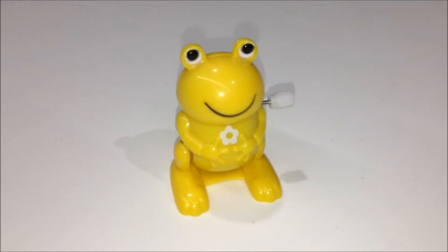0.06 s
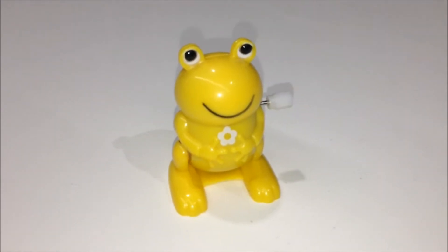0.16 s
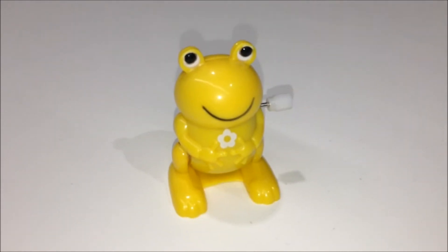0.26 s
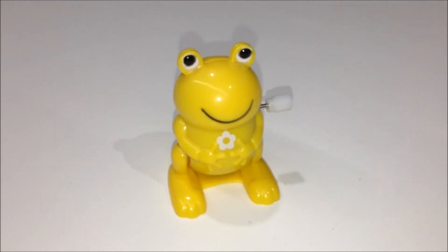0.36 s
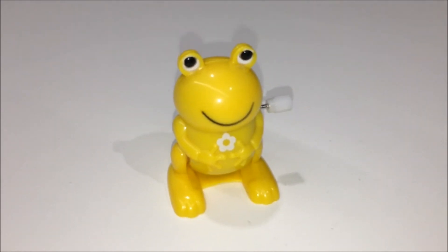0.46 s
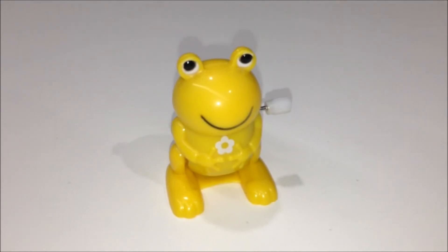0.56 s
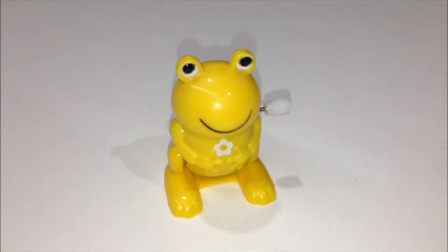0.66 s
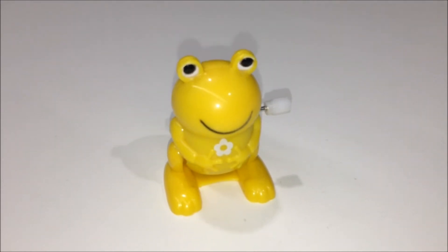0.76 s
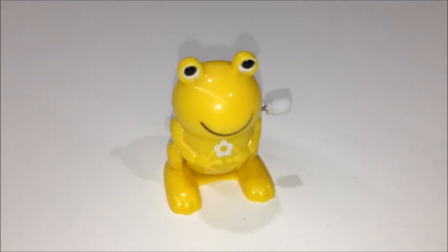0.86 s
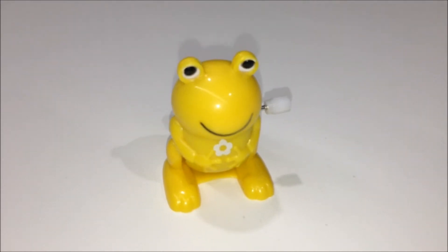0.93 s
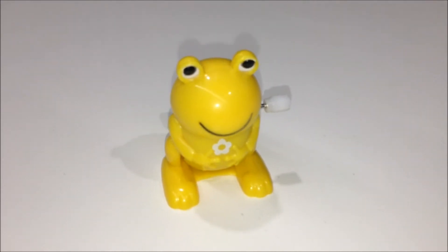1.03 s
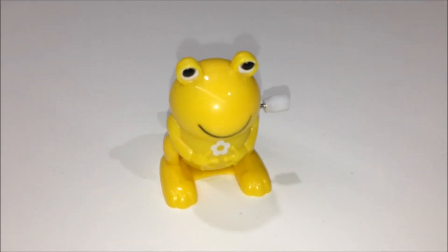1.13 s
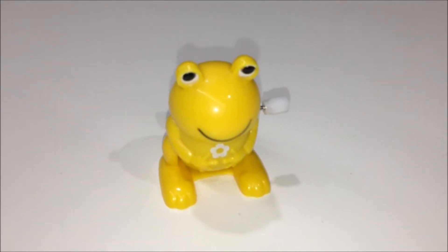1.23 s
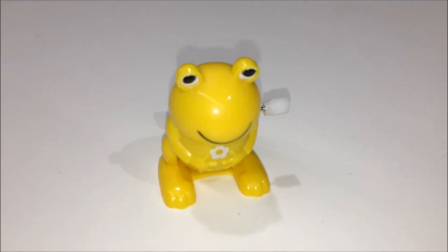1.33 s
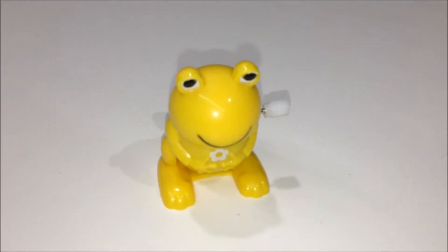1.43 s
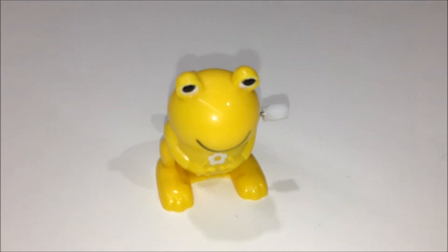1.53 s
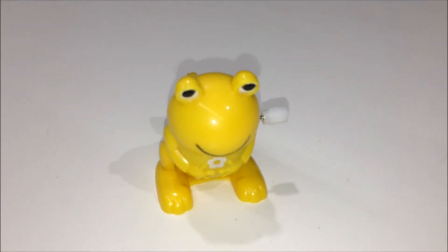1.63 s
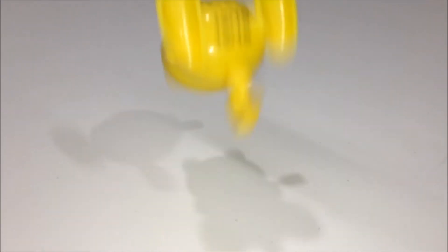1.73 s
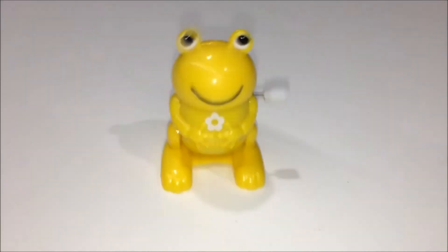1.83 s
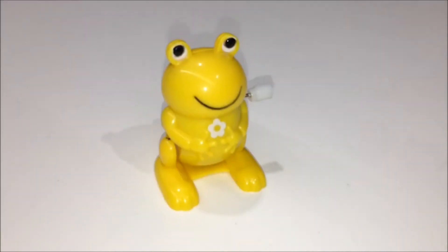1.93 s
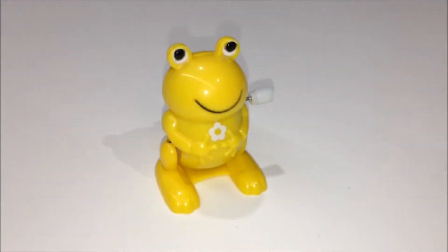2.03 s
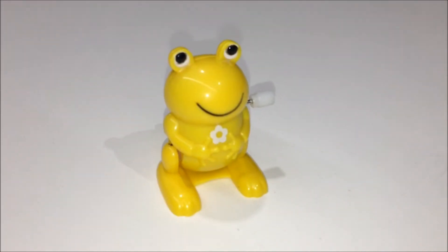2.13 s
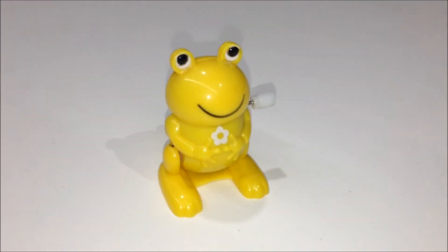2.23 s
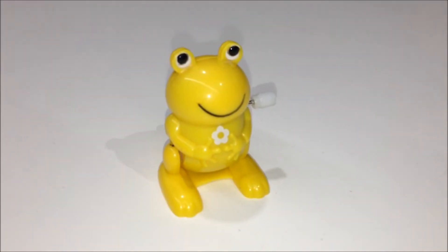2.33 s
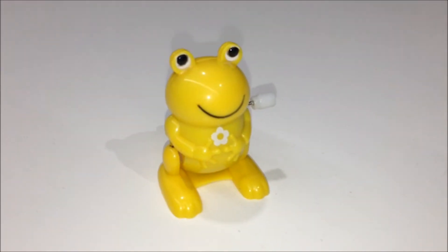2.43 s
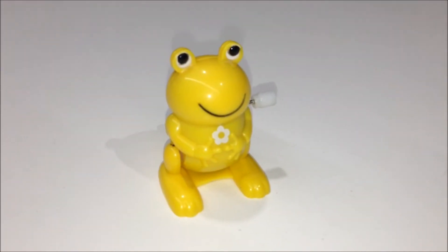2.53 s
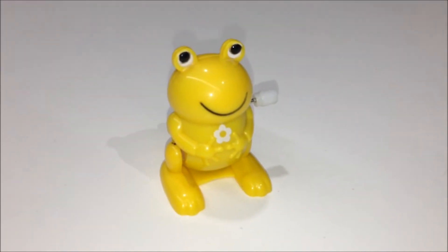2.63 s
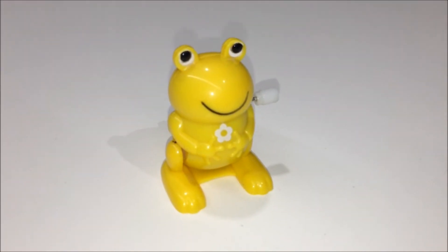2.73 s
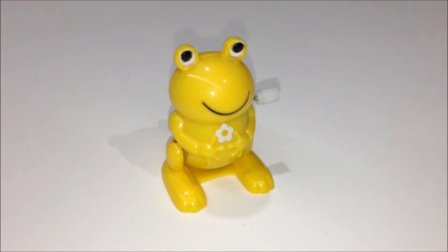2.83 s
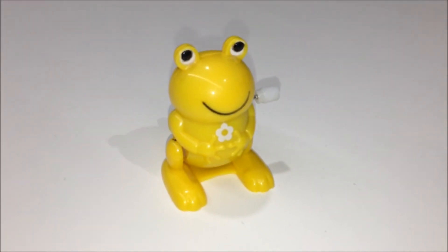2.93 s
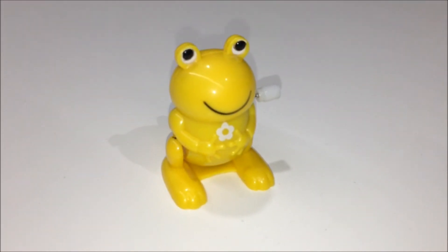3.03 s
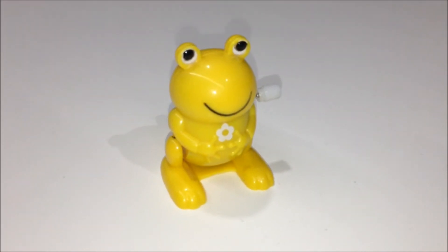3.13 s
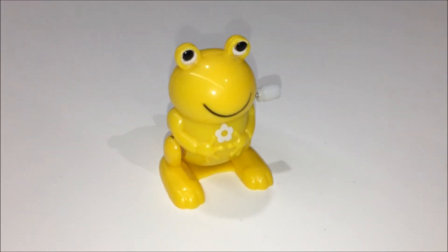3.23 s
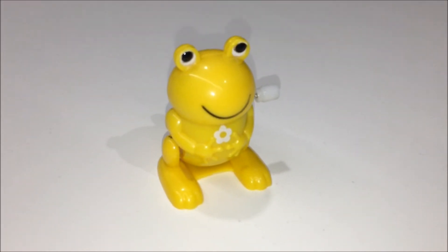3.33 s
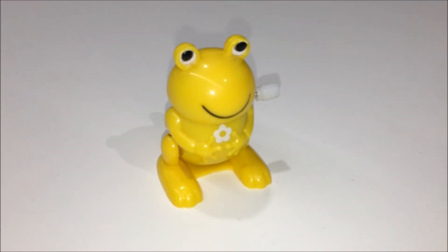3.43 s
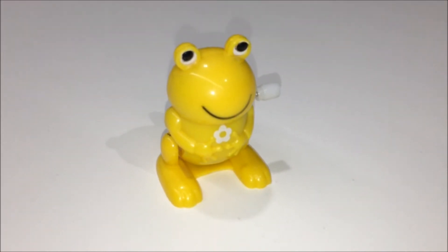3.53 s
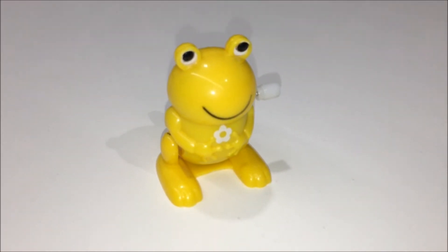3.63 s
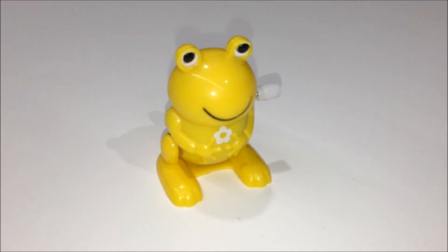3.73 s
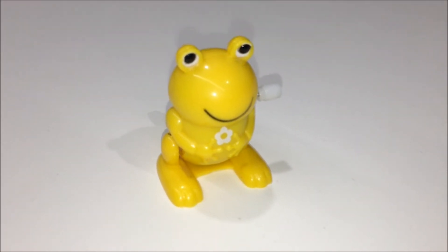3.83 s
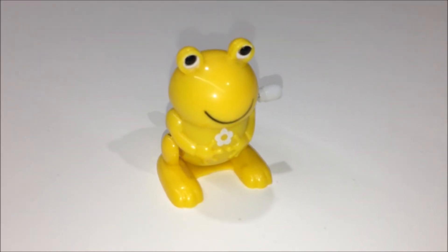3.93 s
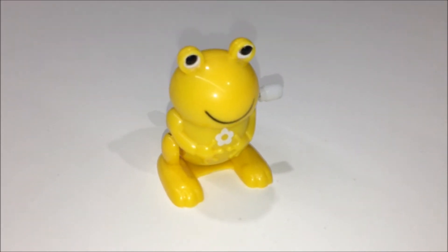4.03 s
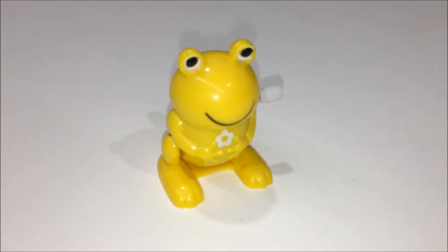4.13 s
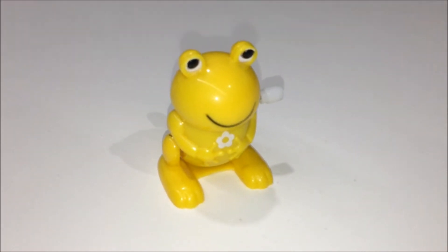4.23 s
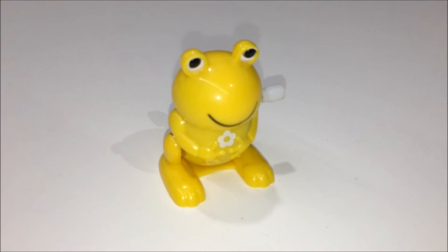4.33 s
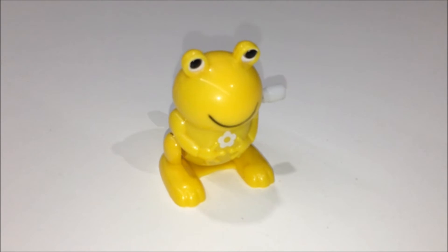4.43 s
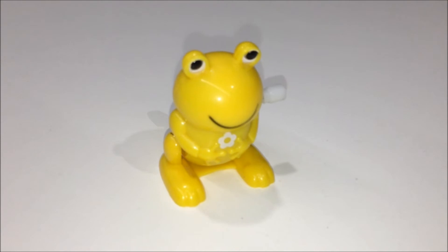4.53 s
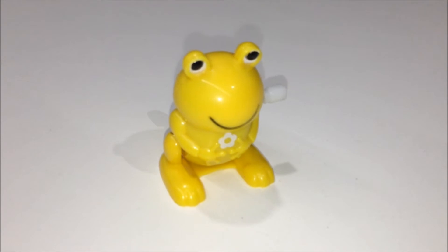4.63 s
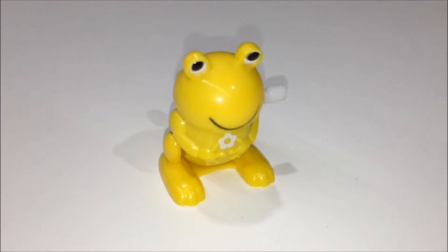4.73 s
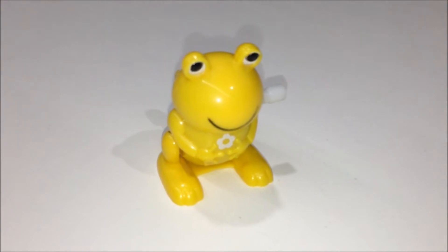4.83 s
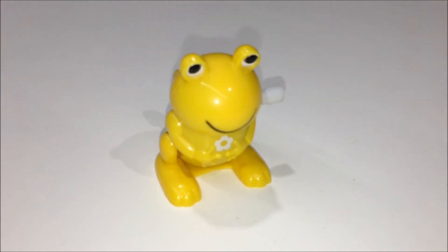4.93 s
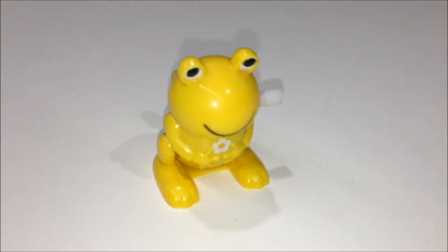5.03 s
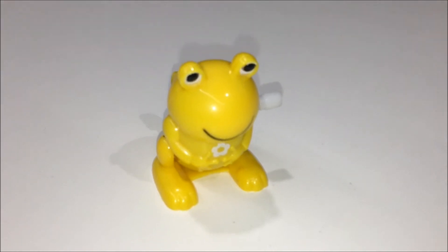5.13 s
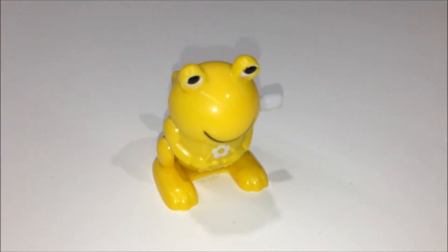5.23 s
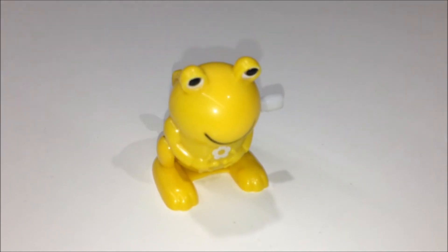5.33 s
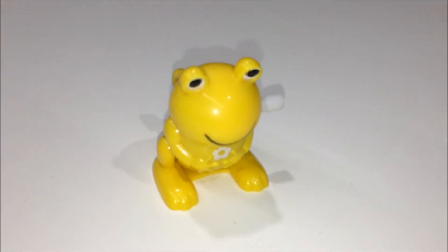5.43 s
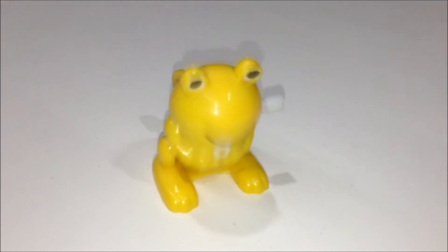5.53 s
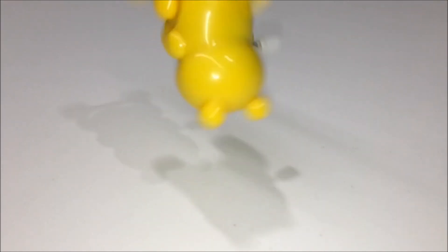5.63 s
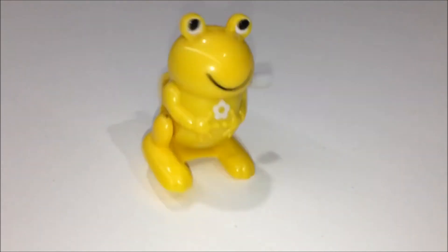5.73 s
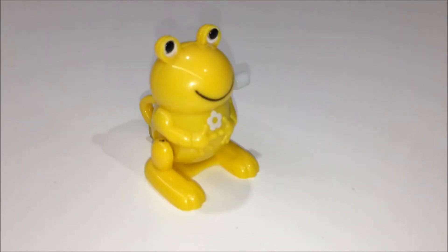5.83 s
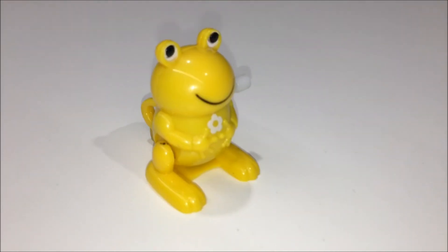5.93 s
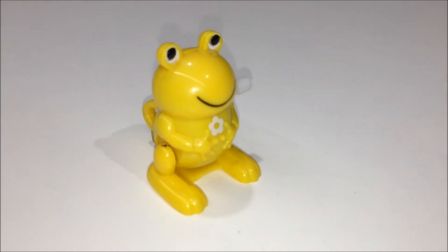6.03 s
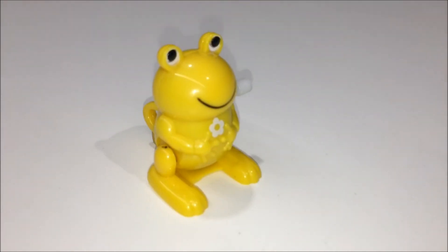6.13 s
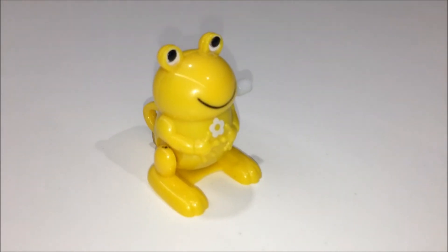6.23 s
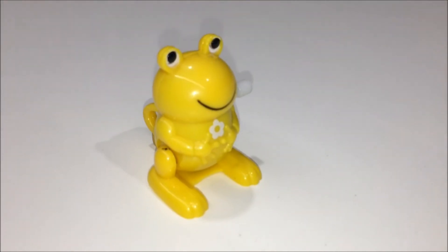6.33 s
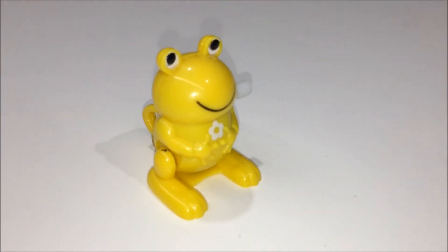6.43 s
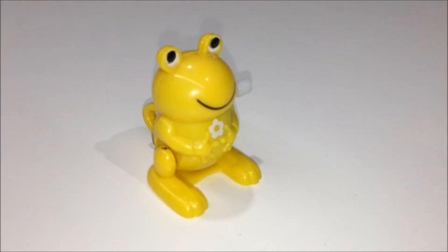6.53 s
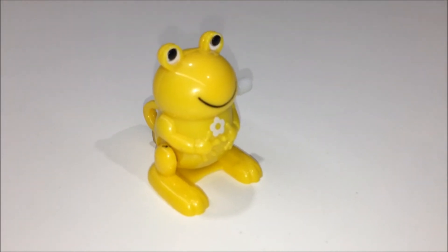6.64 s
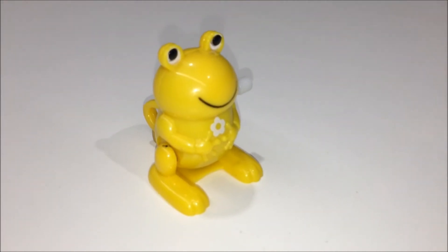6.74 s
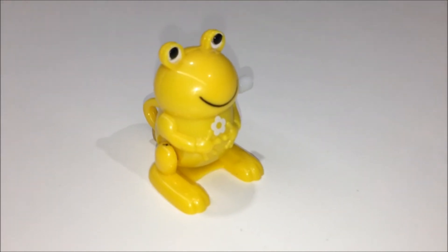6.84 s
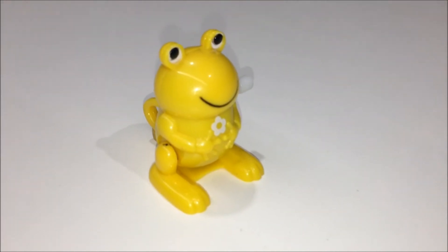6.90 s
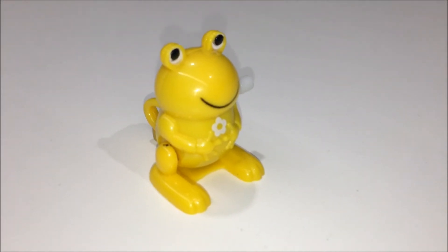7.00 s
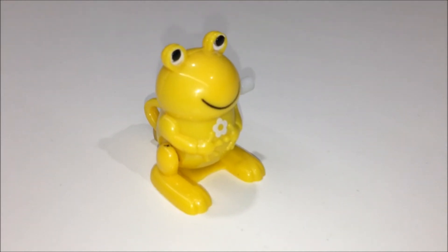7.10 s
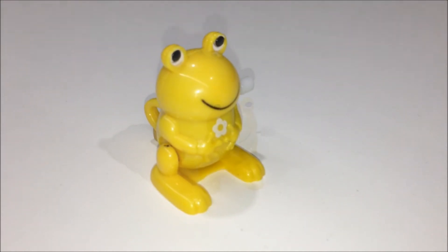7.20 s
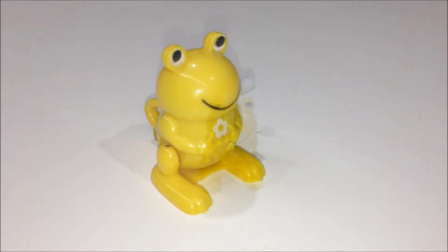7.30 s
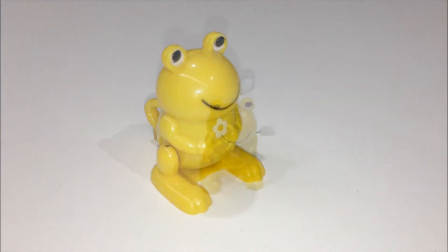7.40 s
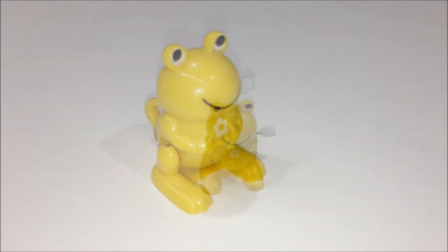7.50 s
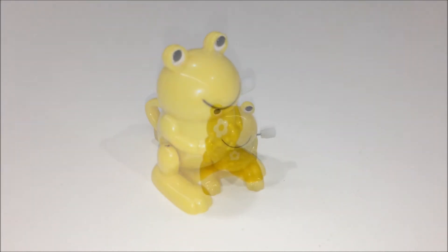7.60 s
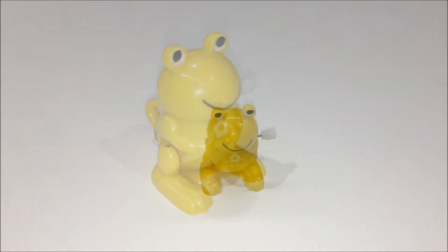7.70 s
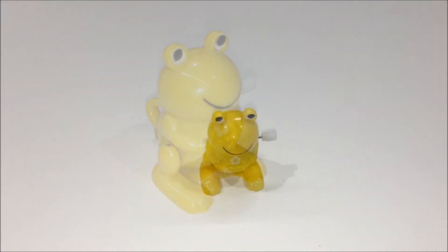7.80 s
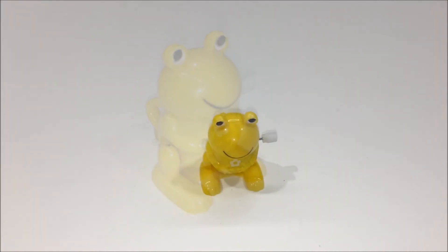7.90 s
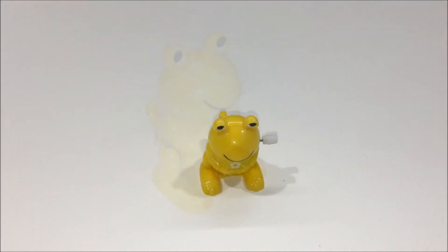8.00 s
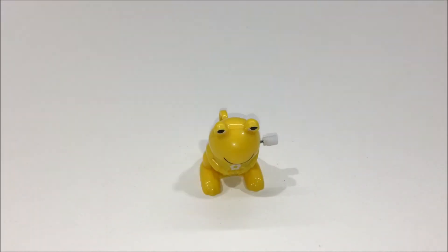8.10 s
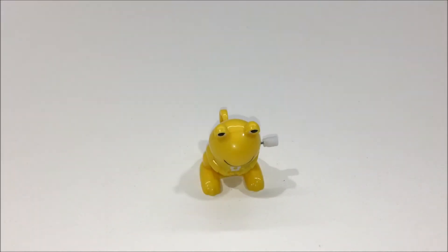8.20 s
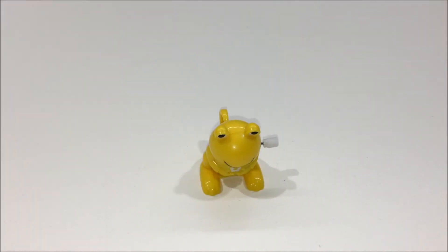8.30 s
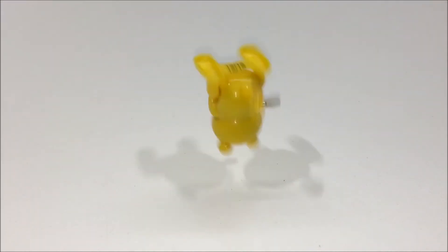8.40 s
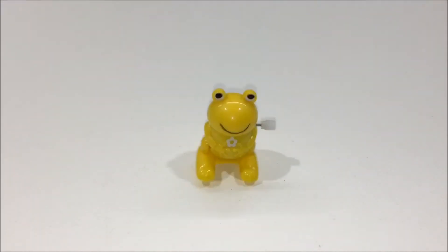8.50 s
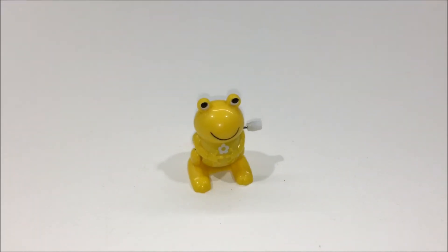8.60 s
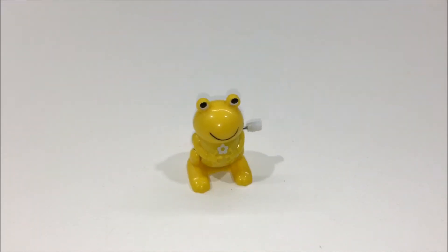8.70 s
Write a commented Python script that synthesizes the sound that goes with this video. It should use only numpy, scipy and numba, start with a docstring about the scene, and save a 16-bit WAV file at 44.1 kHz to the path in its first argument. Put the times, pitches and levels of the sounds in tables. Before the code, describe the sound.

Close microphone, dry quiet room with a soft low murmur. A hollow plastic clockwork motor hisses, strains into a buzzing chatter, then springs free: crisp snap, brief airborne whirr, hard landing and tabletop boom. A longer strain grinds down to distinct rapid ticks before a second jump. The motor abruptly loses speed near the end, then a smaller, higher, steadier whirr takes over, with one sharp light landing.

```python
"""Two jumping clockwork frogs

Two plastic frogs crouch and jump on a tabletop, close by: a big one twice, then a small one once.
A pallet chatters against the escape wheel and rings the hollow shell: a hiss when it runs free, a slow
rattle while a cam tensions the leg spring. Legs snap and landings clatter as bursts of filtered noise.
The table booms in its own modes, over faint echoes and the soft noise of a quiet room."""
import sys
import numpy as np
from scipy import signal
from scipy.fft import rfft, irfft
from scipy.io import wavfile
from numba import njit

SR = 44100
rng = np.random.default_rng(int(sys.argv[2]) if len(sys.argv) > 2 else 0)


def wrap_up_sound(samples):
    """Save the sound to the file named by the first command line argument, as 16-bit audio."""
    columns = np.atleast_2d(samples).T
    # keep every value between -1 and 1, then stretch to whole-number steps
    tamed = np.clip(columns, -1, 1)
    steps = np.round(tamed * 32767).astype(np.int16)
    wavfile.write(sys.argv[1], SR, steps)


N = 386316  # length in samples
TIME = np.arange(N) / SR

# Ways the big frog's hollow shell rings. Each row: pitch in Hz, filter width in Hz, then relative level
# in dB running free, at half load and at full load.
BIG_SHELL = [(1480, 1400, -20, -20, -24), (1870, 450, -16.5, -16.5, -16.5), (3243, 870, -17.5, -6.5, -11.5),
             (3360, 260, -37.5, -15, -1), (4050, 370, -24, -5.5, -14), (4250, 290, -14, -10, -4),
             (5300, 790, -19.5, -13, -15.5), (5700, 3000, -10, -13, -17), (6580, 460, -15, -13, -14.5),
             (7060, 350, -14.5, -9.5, -13), (7560, 570, -12.5, -11.5, -10), (8280, 790, -6.5, -11, -15.5),
             (9030, 340, -8.5, -10, -11), (9400, 240, -22, -14.5, -20), (9930, 560, -14, -12, -28),
             (11140, 1100, -10, -11.5, -11.5), (12000, 400, -17.5, -13.5, -21), (12600, 430, -16, -21, -10),
             (13200, 650, -7, -8.5, -19), (14200, 1500, -23, -27, -12), (15100, 1400, -8, -16.5, -23)]
# The small frog's shell. Each row: pitch in Hz, filter width in Hz, then relative level in dB
# running free and at full load.
SMALL_SHELL = [(1230, 750, -22.5, -23), (1830, 510, -20, -28.5), (2270, 740, -19, -23),
               (3180, 1400, -26, -13), (3670, 1200, -17.5, -11.5), (4220, 710, -11, -10.5),
               (5260, 400, -22, -16.5), (5920, 1300, -12, -14), (7200, 1130, -5.5, -6.5),
               (8470, 1000, -8, -16.5), (8960, 480, -11, -6.5), (9350, 670, -16, -10),
               (9850, 1400, -11, -12.5), (10700, 860, -10, -13), (11400, 1190, -18, -11.5),
               (13100, 2200, -5, -7.5), (15200, 2500, -16, -12.5)]
# Speed the big frog's mainspring can keep up; it runs down at the end.
# Each row: time in seconds, pallet strikes per second before the cam slows them.
BIG_PACE = [(0, 850), (2.68, 800), (5.7, 730.2), (6.05, 690), (6.68, 699), (6.78, 385), (7, 282),
            (7.204, 159.6)]
# The same for the small frog. Each row: time in seconds, pallet strikes per second.
SMALL_PACE = [(7.205, 1226), (8.76, 1169)]
# Each crouch and jump. Each row: the times in seconds when the cam meets the leg lever, grips it, pushes
# hardest, the frog takes off and lands, then the slowest strike rate in Hz (before small stumbles)
# and how far the gearbox pressing on the shell lifts its body modes, in dB.
JUMPS = [(.2, .51, 1.01, 1.856, 2.002, 405, 2.2), (2.68, 3.03, 4.35, 5.722, 5.868, 131, 3.8),
         (7.5, 7.72, 8.03, 8.497, 8.641, 840, 0)]
# The cam meets the leg lever, whose buzz sinks as it is pressed. Each row: start in seconds,
# length in seconds, first pitch in Hz, last pitch in Hz, level in dB relative to the motor.
LEVER_BUZZES = [(0.26, 0.18, 6800, 6660, -7), (0.344, 0.18, 5300, 5100, -5.5), (2.808, 0.2, 5270, 5150, -7),
                (6.711, 0.54, 5650, 5240, -7.5), (7.54, 0.2, 5500, 5160, -10.5)]
# Legs snapping, landings and rocking feet. Each row: start in seconds, rattle length in seconds before
# it fades, level in dB, pitch of the bright crack in Hz, level of the dull clack in dB against the crack.
KNOCKS = [(1.8416, 0.0038, -29.5, 5000, -2), (1.8527, 0.0066, -18, 10000, -8.5),
          (1.991, 0.0043, -30, 8460, -5), (2.001, 0.0017, -18.5, 9000, -3),
          (2.0034, 0.0056, -13, 9150, -11.5), (2.073, 0.0011, -22.5, 6500, -9),
          (2.094, 0.0019, -36, 5500, 3), (5.71, 0.0019, -26, 4530, -6),
          (5.7187, 0.0075, -19.5, 10000, -9.5), (5.858, 0.0016, -22, 7500, -6),
          (5.8675, 0.0025, -16.5, 8000, -4.5), (5.869, 0.007, -13, 8900, -10),
          (5.938, 0.0013, -25, 3740, -5), (5.9627, 0.00061, -15, 8200, -11.5),
          (5.99, .0015, -28, 5300, -12), (8.492, 0.0076, -21, 10000, -13.5), (8.639, 0.0066, -19, 9900, -7),
          (8.646, 0.0022, -8, 8550, -21), (8.7232, .0008, -24.5, 9050, -8)]
# Dull clack of feet and legs. Each row: pitch in Hz, filter width in Hz, relative level in dB.
CLACK_MODES = [(644, 850, -3.5), (1360, 730, 4.5), (1820, 400, 6), (3280, 3800, 4.5)]
# Weight on the tabletop. Each row: start in seconds, push in dB, contact time in seconds,
# low sway in dB relative to the push.
THUMPS = [(1.853, -17, 0.00089, -16), (2.0023, 0.5, 0.00085, -20.5), (2.069, -8.5, 0.0021, -45),
          (5.721, -16, 0.0015, -23), (5.869, 1, 0.00092, -34), (5.94, -13, 0.0027, -40),
          (8.641, -9.5, 0.00013, -44)]
# Ways the tabletop rings. Each row: pitch in Hz, level in dB, time to fade by 60 dB in seconds.
TABLE_MODES = [(126, -49, 0.73), (170.5, -35, 0.46), (194.4, -35, 0.32), (282, -30, 0.29),
               (336, -33.5, 0.26), (351.2, -33, 0.34), (414.6, -37, 0.33), (432, -46, 0.15),
               (569.5, -33, 0.25), (647.4, -33, 0.12), (830, -41, 0.12)]
# Low drone of the small frog's run. Each row: pitch in Hz, filter width in Hz, level in dB.
DRONE = [(105.5, 35, -58), (208, 200, -58)]
# Colour of the room noise. Each row: pitch in Hz, relative level in dB per Hz.
ROOM_COLOUR = [(25, -14.5), (55, -13.5), (100, -7), (135, -7.5), (155, -1), (225, 0.5), (265, -8.5),
               (380, -14), (480, -15.5), (750, -19), (1000, -15), (1650, -20.5), (2300, -28.5),
               (15000, -38)]

ROOM_DB = -51.5
TOP_HZ = 15850  # nearly nothing is left above this
DRAG_OCTAVES, DRAG_ATTACK_S = .36, .1  # the lever brakes the gears as soon as the cam meets it
GRIP_ATTACK_S, GRIP_RELEASE_S = 0.098, .2  # the leg spring's load comes on and lets go
LOOSE_LOAD, LOAD_PER_OCTAVE = .24, .28  # most load (0-1) with the lever loose; load per octave of slowing
PRESS_HZ, PRESS_OCTAVES = 3800, 0.24  # centre and spread of the body modes that the gearbox lifts
PRESS_REBOUND = 0.23  # share by which those modes dip past the hardest push
STUMBLE_OCTAVES, STUMBLE_HZ = .035, 11  # unsteady pace under full load
CAM_SHARPNESS = 1.3  # above 1 the cam's resistance gathers towards the hardest push
SAG_OCTAVES, SAG_S = .24, .45  # the whirr sags at take-off and recovers
IMPACT_TOP_HZ = 5200  # the blow itself helps ring modes below this; the scrape alone rings those above


def undb(db):
    """Turn decibels into a gain."""
    return np.exp(np.asarray(db) * (np.log(10) / 20))


def unit(x):
    """Scale a sound to an average (rms) level of 1."""
    return x / np.sqrt(np.mean(x ** 2))


@njit
def bandpass(x, hz, width):
    """State-variable band-pass whose centre may move every sample."""
    y, band, low = np.empty(len(x)), 0., 0.
    for i in range(len(x)):
        g = np.tan(np.pi * hz[i] / SR)
        damping = np.pi * width / SR * (1 + g * g) / g
        v = (band + g * (x[i] - low)) / (1 + g * (g + damping))
        y[i] = damping * v
        low += 2 * g * v
        band = 2 * v - band
    return y


def resonate(x, hz, width):
    """Ring one resonance: the band-pass twice in a row, scaled to rms 1."""
    centre = np.minimum(hz + np.zeros(len(x)), SR * .45)
    once = bandpass(x + 1e-18, centre, float(width))
    return unit(bandpass(once, centre, float(width)))


def add(track, start, sound):
    """Mix a sound into the track at a time in seconds."""
    i = max(int(start * SR), 0)
    track[i:i + len(sound)] += sound[:len(track) - i]


def grit(size, spread_db=1.5):
    """Noise of tiny contacts whose strength jumps by chance every 8 samples."""
    strength_db = spread_db * np.repeat(rng.standard_normal(size // 8 + 1), 8)[:size]
    return rng.standard_normal(size) * undb(strength_db)


def waver(size, hz):
    """Smooth chance with a spread near 1, drawn anew hz times a second."""
    steps = rng.standard_normal(size // 100)
    return np.interp(TIME[:size] * hz, np.arange(len(steps)), steps)


def motor(pace, shell, grip_load, free_db, slowing_db, stall_db, tilt_db, shimmer_db, impact):
    """Pallet strikes ring the shell; load moves the ring between modes and slowing changes level and tone.

    Returns the sound, the strike force, and that force at the motor's level."""
    start, end = pace[0][0], pace[-1][0]
    t = TIME[max(int(start * SR), 0):int(end * SR)]
    rate, load, press_db = clockwork(t, pace, grip_load)
    slowed = np.log2(pace[0][1] / rate)  # octaves
    level = undb(free_db + slowing_db * slowed + stall_db * slowed ** 2)
    blows, strikes, tip = chatter(rate)
    rub = .72 * (rate / 600) ** 2  # fast gears rub between the strikes
    force = np.sqrt((strikes ** 2 + rub ** 2) / (1 + rub ** 2))
    force = force * undb(.5 * waver(len(t), hz=45.96))
    bright_db = tilt_db * np.log2(rate / 600)
    sound, power = 0, 0
    for hz, width, *load_db in shell:
        pitch = np.log2(hz / 9000)
        db = np.interp(load, np.linspace(0, 1, len(load_db)), load_db)
        db = db + bright_db * pitch + shimmer_db * waver(len(t), hz=29.55)
        body_db = press_db * np.exp(-(np.log2(hz / PRESS_HZ) / PRESS_OCTAVES) ** 2)
        # under load one pallet tip sounds bright, the other dull
        tick_tock = undb(.6 * load * tip * pitch)
        # loaded teeth may hit as well as scrape
        share = np.clip(impact * load, 0, 1) * (hz < IMPACT_TOP_HZ)
        scrape = force * grit(len(t), spread_db=2)
        push = np.sqrt(share) * blows + np.sqrt(1 - share) * scrape
        sound = sound + undb(db + body_db) * resonate(push * tick_tock, hz, width)
        power = power + undb(db) ** 2
    out, drive, shaking = np.zeros((3, N))
    add(out, start, level * sound / np.sqrt(power))
    add(drive, start, force)
    add(shaking, start, level * force)
    return out, drive, shaking


def clockwork(t, pace, grip_load):
    """The cam's resistance rises and falls in one arch per crouch, slowing the gears and loading the spring.

    Returns the strike rate in Hz, the load (0-1) and the gearbox pressure in dB."""
    free = np.interp(t, *np.transpose(pace))
    rate, grip, press_db = free, 0, 0
    for meets, grips, hardest, up, down, slowest_hz, db in JUMPS:
        arch = np.interp(t, [meets, hardest, up], [0, 1, 0])
        effort = np.sin(np.pi / 2 * arch) ** CAM_SHARPNESS
        drag = DRAG_OCTAVES * np.interp(t, [meets, meets + DRAG_ATTACK_S, hardest], [0, 1, 0]) ** 2
        sag = SAG_OCTAVES * np.interp(t, [up, up + SAG_S], [1, 0], left=0)
        rate = rate * (slowest_hz / free) ** effort / 2 ** (drag + sag)
        half = GRIP_ATTACK_S / 2
        grip_times = [grips - half, grips + half, up, up + GRIP_RELEASE_S]
        grip = grip + np.interp(t, grip_times, [0, 1, 1, 0])
        sinking, rising = (grips + hardest) / 2, (hardest + up) / 2
        press_times = [meets, grips, sinking, rising, down]
        press_db = press_db + db * np.interp(t, press_times, [0, 1, 1, -PRESS_REBOUND, 0])
    strain = LOAD_PER_OCTAVE * np.log2(free[0] / rate)
    loose = np.minimum(strain, LOOSE_LOAD)
    load = np.clip(grip * (grip_load + strain) + (1 - grip) * loose, 0, 1)
    stumble = STUMBLE_OCTAVES * load * waver(len(t), hz=STUMBLE_HZ)
    return rate * 2 ** stumble, load, press_db


def chatter(rate, jitter=.07, scatter_db=-0.6):
    """The pallet strikes a tooth and scrapes along it briefly, its two tips taking turns.

    Returns the blows, the force envelope of the scrapes, and the striking tip (+1 or -1)."""
    scrape_s = .00028
    slip, force = rng.standard_normal((len(rate) // 10, 2)).T
    gaps = np.maximum(1 + jitter * slip, .5)  # uneven steps, 1 is a regular strike
    at = np.searchsorted(np.cumsum(rate) / SR, np.cumsum(gaps))
    heard = at < len(rate)
    strikes = np.bincount(at[heard], undb(scatter_db * force[heard]) ** 2, len(rate))
    age = TIME[:SR // 100] / scrape_s
    energy = np.abs(signal.fftconvolve(strikes / rate, age * np.exp(-age))[:len(rate)])
    tip = (-1.) ** np.cumsum(strikes > 0)
    return unit(np.sqrt(strikes / rate)), unit(np.sqrt(energy)), tip


def lever(shaking, width_hz=850):
    """The loosely touching lever buzzes along with the pallet until the cam holds it tight."""
    out = np.zeros(N)
    for start, length, from_hz, to_hz, db in LEVER_BUZZES:
        force = shaking[int(start * SR):][:int(length * SR)]
        n = len(force)
        buzz = force * resonate(grit(n), np.geomspace(from_hz, to_hz, n), width_hz)
        add(out, start, undb(db) * signal.windows.tukey(n, .5) * buzz)
    return out


def knocks(spread=0.69, fade_s=0.00067, clack_fade_s=.002):
    """Loose plastic parts collide many times within milliseconds: a bright crack over a duller clack."""
    out, t = np.zeros(N), TIME[:SR // 20]
    rise = np.minimum(t / .0003, 1)
    for start, length, db, hz, clack_db in KNOCKS:
        after = np.maximum(t - length, 0)  # time since the rattle ended
        crack = resonate(grit(len(t), spread_db=3.2), hz, spread * hz)
        clack = 0
        for mode_hz, width, mode_db in CLACK_MODES:
            clack = clack + undb(mode_db) * resonate(rng.standard_normal(len(t)), mode_hz, width)
        crack = crack * np.exp(-after / fade_s)
        clack = undb(clack_db) * unit(clack) * np.exp(-after / clack_fade_s)
        add(out, start, undb(db) * rise * (crack + clack))
    return out


def airborne(x, rest_lag_s=.00003, slant=0.99):
    """In the air the motor is also heard mirrored in the tabletop: a comb that sweeps with the height."""
    gravity, sound_speed, bounce = 9.81, 343, .38  # m/s2, m/s, strength of the mirrored sound
    height = 0  # metres
    for _, _, _, up, down, _, _ in JUMPS:
        height = height + np.maximum(gravity / 2 * (TIME - up) * (down - TIME), 0)
    lag = rest_lag_s + 2 * slant * height / sound_speed
    mirror = np.interp(TIME - lag, TIME, x)
    share = bounce * np.minimum(height / 0.011, 1)  # full from 11 mm up
    return (x + share * mirror) / np.sqrt(1 + share ** 2)


def tabletop(drive, shake_db=-62, thud_db=-23, thud_s=0.0089, boom_db=-39, boom_s=0.054):
    """Each push thuds, then the board rings in its modes; the running motor keeps them faintly alive."""
    t = TIME[:SR]
    ring = 0
    for hz, db, t60 in TABLE_MODES:
        ring = ring + undb(db) * np.cos(2 * np.pi * hz * t) * np.exp(-np.log(1000) * t / t60)
    shaken = signal.fftconvolve(drive * rng.standard_normal(N), np.diff(ring))[:N]
    out = undb(shake_db) * unit(shaken)
    for start, db, contact, sway_db in THUMPS:
        push = np.exp(-.5 * (t[:SR // 100] / contact * 4 - 2) ** 2)
        fade = undb(thud_db) * np.exp(-t / thud_s) + undb(boom_db) * np.exp(-t / boom_s)
        thud = fade * resonate(rng.standard_normal(len(t)), 300, 900)
        # the whole board gives under the weight
        sway = undb(sway_db) * np.sin(2 * np.pi * 70 * t) * np.exp(-t / 0.005)
        add(out, start, undb(db) * signal.fftconvolve(ring + thud + sway, push / push.sum()))
    return out


def rumble(drive):
    """A low, rough drone of narrow noise bands follows the small frog's strike force."""
    drone = 0
    for hz, width, db in DRONE:
        drone = drone + undb(db) * resonate(rng.standard_normal(N), hz, width)
    return drive * drone


def reflections(x, wet_db, t60, first_s=0.00077):
    """Faint, quickly dying echoes of a small room, made with a fading burst of noise."""
    t = TIME[:SR // 2]
    tail = rng.standard_normal(len(t)) * np.exp(-np.log(1000) * t / t60) * (t > first_s)
    return undb(wet_db) * signal.fftconvolve(x, tail / np.linalg.norm(tail))[:N]


def background(waver_db=1):
    """A soft, low room murmur: coloured noise whose level wavers slightly."""
    hz, db = np.transpose(ROOM_COLOUR)
    bins_hz = np.arange(N // 2 + 1) * SR / N
    colour = undb(np.interp(np.log(bins_hz + 1), np.log(hz), db))
    murmur = unit(irfft(rfft(rng.standard_normal(N)) * colour, N))
    return murmur * undb(ROOM_DB + waver_db * waver(N, hz=7.1))


def scene():
    """Both frogs, the table and the room; the same in both ears."""
    big, big_drive, big_shaking = motor(
        BIG_PACE, BIG_SHELL, grip_load=.26, free_db=-28, slowing_db=-7, stall_db=-1.04,
        tilt_db=-0.37, shimmer_db=1.94, impact=0.39)
    small, small_drive, small_shaking = motor(
        SMALL_PACE, SMALL_SHELL, grip_load=.9, free_db=-28, slowing_db=-5, stall_db=0.8,
        tilt_db=0.5, shimmer_db=1.3, impact=0)
    toys = airborne(big + small) + lever(big_shaking + small_shaking) + knocks()
    table = tabletop(big_drive + small_drive) + rumble(small_drive)
    room = reflections(toys, wet_db=-23, t60=.2) + background()
    mono = toys + table + room
    return np.array([mono, mono])


def record(dry):
    """The recorder clips at full scale, then a steep low-pass cuts the top."""
    low_pass = signal.ellip(10, .2, 70, TOP_HZ, fs=SR, output="sos")
    return signal.sosfilt(low_pass, np.clip(dry, -1, 1))


dry = scene()
out = record(dry)
wrap_up_sound(out)
```